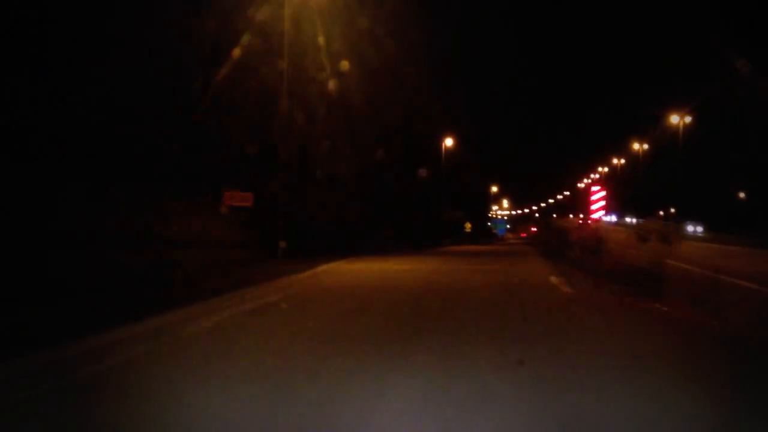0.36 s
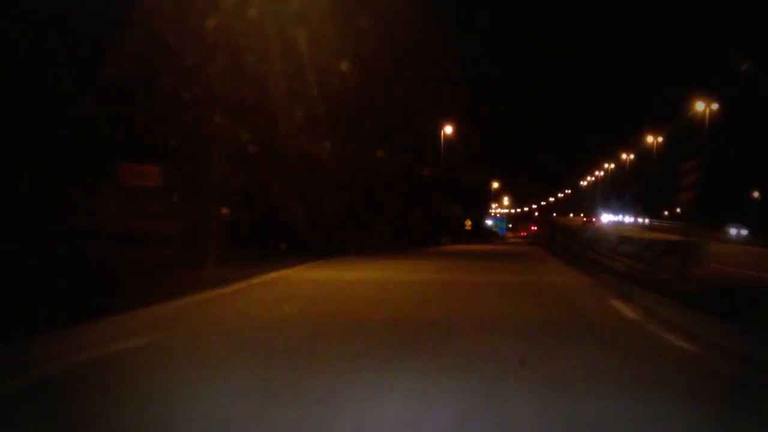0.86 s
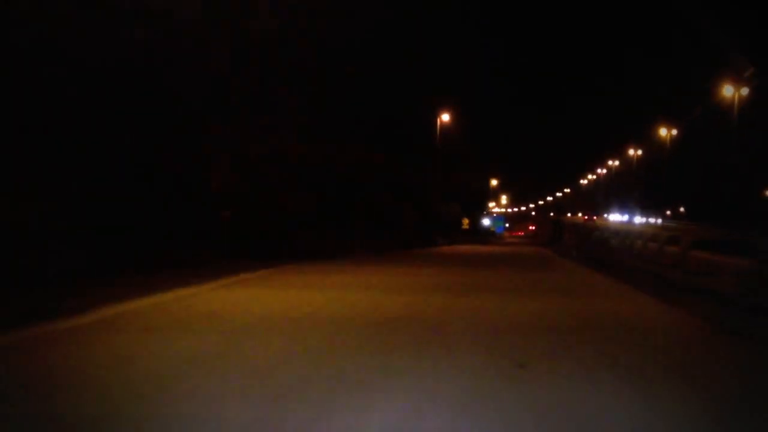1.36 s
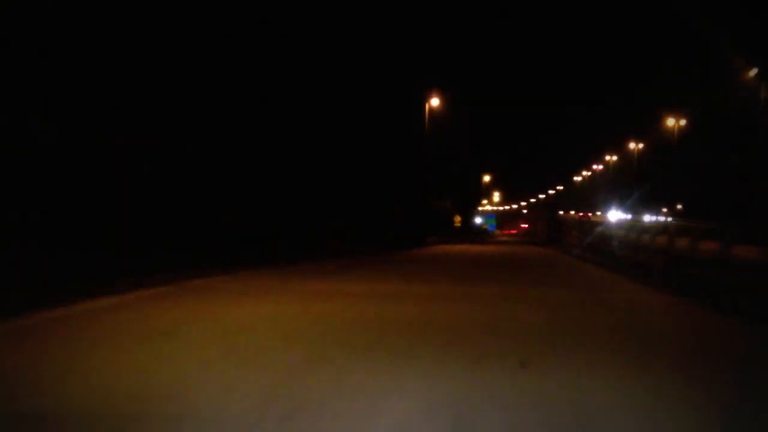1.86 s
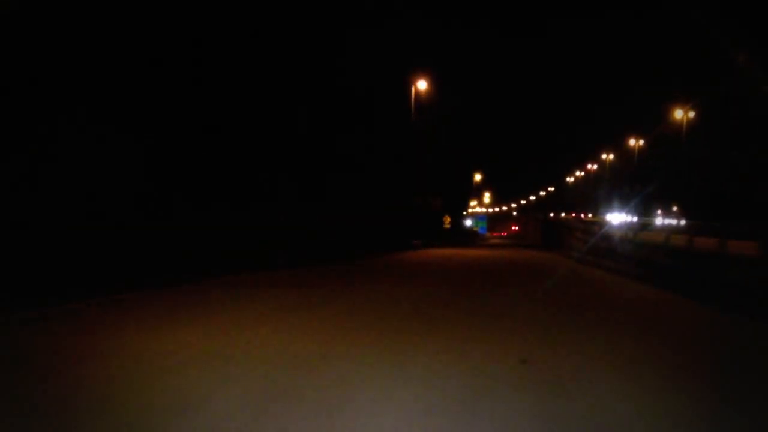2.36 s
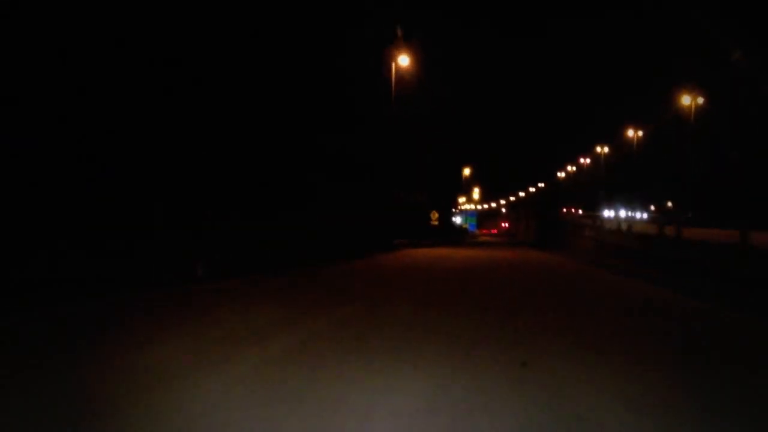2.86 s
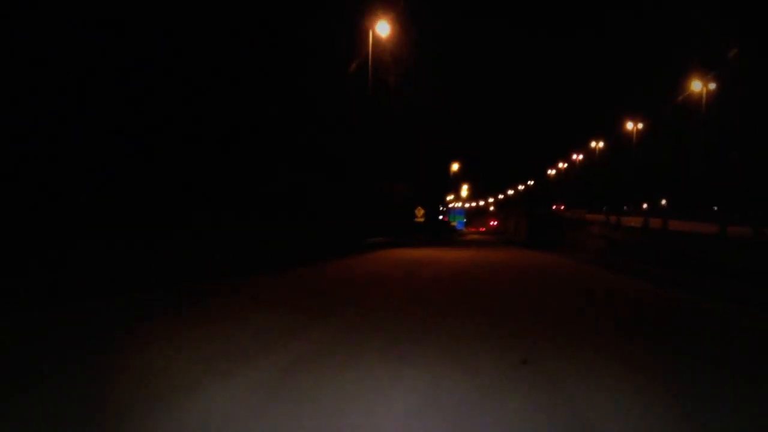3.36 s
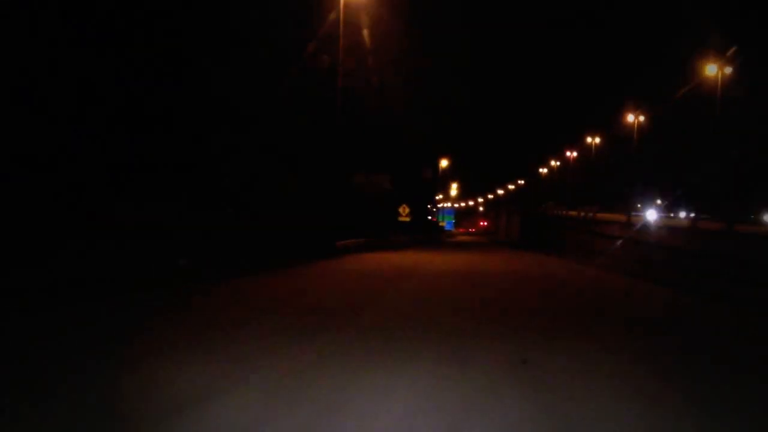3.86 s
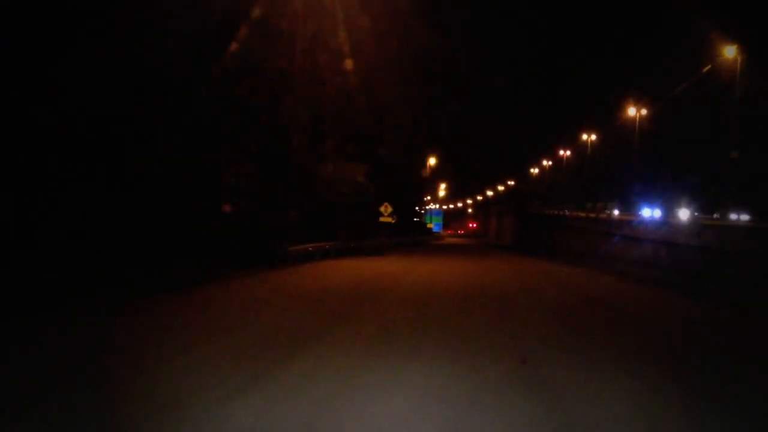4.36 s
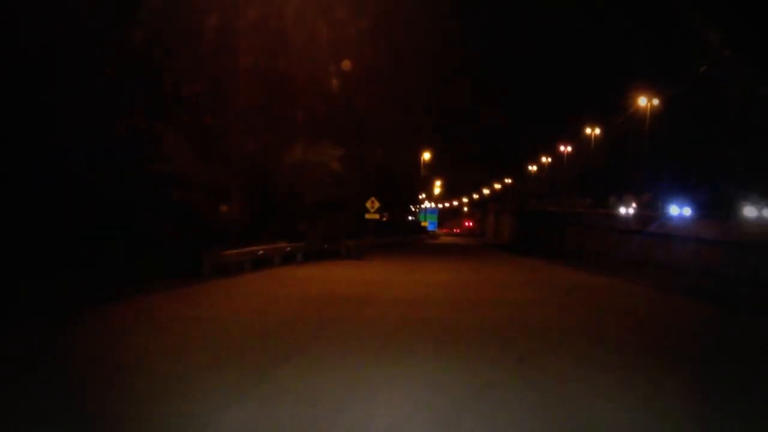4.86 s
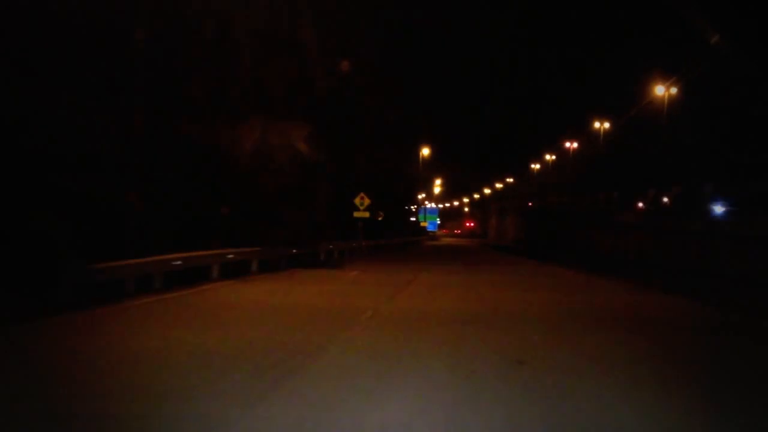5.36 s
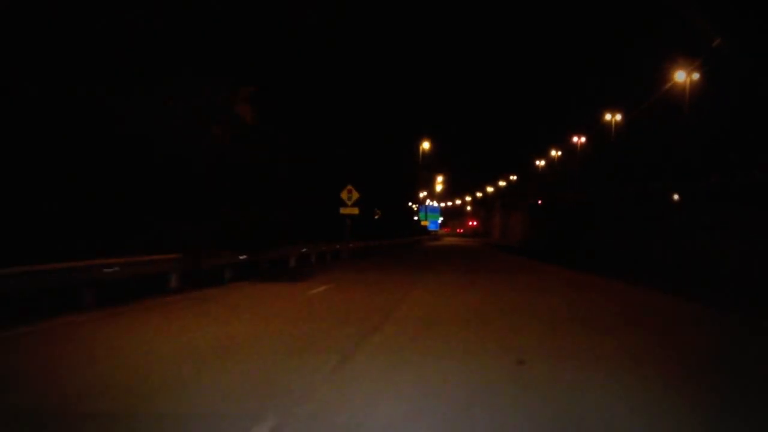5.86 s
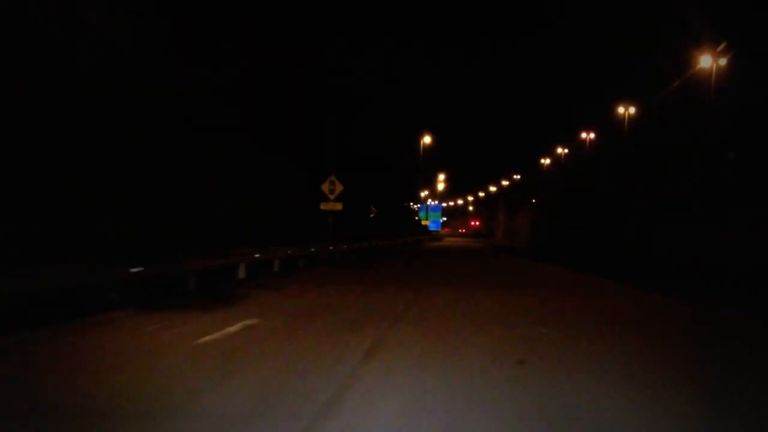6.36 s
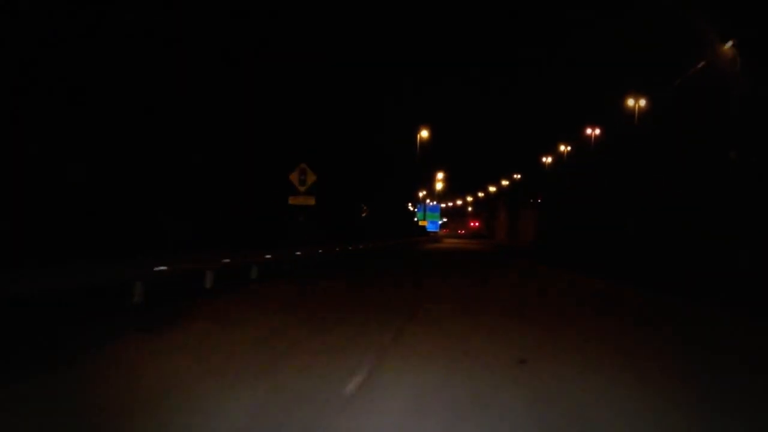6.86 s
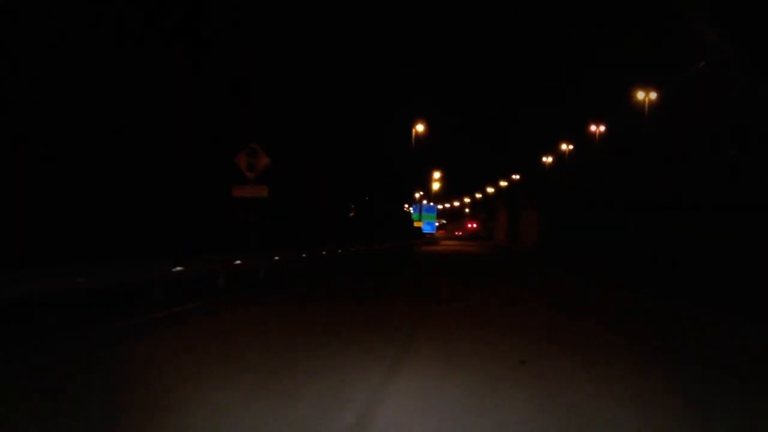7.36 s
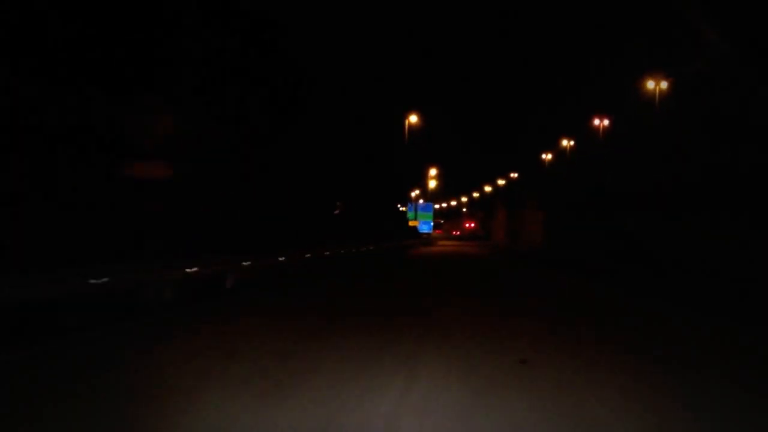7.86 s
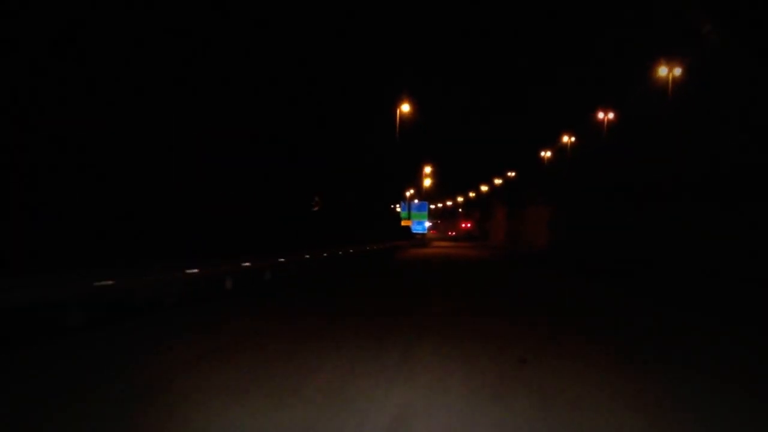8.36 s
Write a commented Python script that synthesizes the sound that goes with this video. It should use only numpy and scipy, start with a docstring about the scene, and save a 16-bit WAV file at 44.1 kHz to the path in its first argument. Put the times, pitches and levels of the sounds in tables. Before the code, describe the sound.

A straight-piped petrol car cruises, recorded close inside the cabin. The deep humming exhaust tone swells and fades through resonances as revs fall for over six seconds, with only a slight hitch midway. Low road rumble and dull roar surround it; clusters of hollow thuds, rattles and low throbs mark uneven tarmac. Then the engine pulls, stepping up twice in pitch, with one sharp trim click near the end.

```python
"""A firing note and its orders boom inside a six-cylinder car with an open exhaust: the pitch coasts down,
then the throttle opens in two steps and the note climbs. The engine is a sum of orders locked to one firing phase.
Shaped noise gives the tyre rumble, road roar and hiss; decaying modes and noise bursts give the bumps
of the road, small metal pings and the ticks of loose trim near the microphone; low throbs swell beside the bumps."""
import sys
import numpy as np
from scipy import signal
from scipy.fft import rfft, irfft, next_fast_len
from scipy.io import wavfile
from scipy.ndimage import uniform_filter1d

SR = 44100
rng = np.random.default_rng(int(sys.argv[2]) if len(sys.argv) > 2 else 0)


def store_pcm(level_fs):
    """Save levels as 16-bit WAV."""
    pcm = np.round(np.clip(level_fs, -1, 1) * 32767).astype(np.int16)
    wavfile.write(sys.argv[1], SR, np.atleast_2d(pcm).T)


def nominal_scale(level):
    """Amplitude ratio for a level in decibels (scalar or array-like)."""
    x = np.asarray(level, float) / 20
    return 10 ** x


N = 374402  # length in samples

# Colour of plastic trim clicking. Each row: frequency in Hz, relative level in dB per Hz
TRIM_COLOUR = [(1800, -30), (2600, -1.5), (3300, -0.5), (4500, 0.5), (6000, -1), (7700, -2), (9000, -11),
               (10000, -9.5), (12000, -7.5), (15000, -11)]


def evened(x):
    """Scales to rms 1."""
    return x / np.sqrt(np.mean(x ** 2) + 1e-20)


def curves(rows):
    """One sample-rate curve for each column after the time."""
    s, *columns = np.transpose(rows)
    return [np.interp(np.arange(N) / SR, s, c) for c in columns]


def read(points, hz):
    """Reads a spectrum in dB on a log-frequency axis."""
    f, db = np.transpose(points)
    return np.interp(np.log(hz + 1), np.log(f + 1), db, left=-100, right=-100)


def coloured(x, points):
    """Filters x by a spectrum."""
    size = next_fast_len(len(x))
    gain = nominal_scale(read(points, np.fft.rfftfreq(size, 1 / SR)))
    return irfft(rfft(x, size) * gain, size)[:len(x)]


def add(mix, s, sound):
    """Mixes a sound in at time s."""
    part = mix[max(round(s * SR), 0):][:len(sound)]
    part += sound[:len(part)]


def drift(size):
    """Slow chance of rms 1, smooth over size samples."""
    return evened(uniform_filter1d(uniform_filter1d(rng.standard_normal(N), size), size))


def lift(resonances, hz):
    """Summed lift in dB of resonances at hz."""
    return sum(db / (1 + (2 * (hz - f) / width) ** 2) for f, width, db in resonances)


def panels(x):
    """The resonances of the cabin panels lift their bands."""
    # Each row: frequency in Hz, width in Hz, lift in dB
    resonances = [(660, 40, 3), (892, 60, 3), (1060, 60, 2), (1237, 35, 3), (1390, 70, 3), (1650, 60, 3),
                  (1810, 50, 3), (2240, 70, 4), (2395, 50, 5), (2826, 80, 5), (3003, 60, 3), (7786, 90, 3)]
    size = next_fast_len(N)
    gain = nominal_scale(lift(resonances, np.fft.rfftfreq(size, 1 / SR)))
    return irfft(rfft(x, size) * gain, size)[:N]


def rushing(points, patchy_db, flicker_db):
    """Noise of a spectrum with drifting patches and a flicker shared by all frequencies; rms 1."""
    frames = N // 256 + 5
    a, b, patches = rng.standard_normal((frames, 513, 3)).T
    patches = uniform_filter1d(patches, size=8, axis=0)  # across frequency
    patches = evened(uniform_filter1d(patches, size=10, axis=1))  # across time
    flicker = evened(uniform_filter1d(rng.standard_normal(frames), size=4))
    field = nominal_scale(patchy_db * patches + flicker_db * flicker)
    white = signal.istft((a + 1j * b) * field, nperseg=1024, noverlap=768)[1][:N]
    return evened(coloured(white, points))


def road():
    """Rumble through the body, roar of the treads, hiss of air, and the ring of the air in the tyres."""
    # Each row: time in seconds, then levels in dB: roar ahead of the panels, rumble, ring of the tyre air
    road_levels = [(0.0, -44.5, -28.5, -36), (0.7, -45.5, -36, -42), (1.1, -45, -33, -40),
                   (2.7, -47, -34, -40), (3.0, -46, -29.5, -40.5), (3.25, -46, -38.5, -38.5),
                   (3.8, -48, -31, -39), (5.3, -49.5, -34.5, -40.5), (5.6, -49.5, -32.5, -40),
                   (6.6, -50, -35.5, -39.5), (7.3, -47.5, -33, -46), (8.0, -46, -33.5, -46.5),
                   (8.49, -46.5, -30.5, -44)]
    # Colours of the three noises. Each row: frequency in Hz, relative level in dB per Hz
    rumble_colour = [(30, -27.5), (55, -17.5), (75, -15), (110, -0.5), (160, 0.5), (240, -1), (330, -4),
                     (450, -12), (600, -21), (900, -41)]
    roar_colour = [(240, -41.5), (400, 0.5), (490, 3), (557, -3.5), (727, -1), (804, -2), (1020, -4),
                   (1230, -8.5), (1770, -15.5), (1930, -17), (2340, -22), (3600, -41.5), (4680, -54),
                   (7920, -120)]
    hiss_colour = [(1500, -41), (2500, -0.5), (3500, -3.5), (5000, -8.5), (7000, -13), (7900, -15.5),
                   (8800, -22), (10000, -32)]

    roar_db, rumble_db, ring_db = curves(road_levels)
    hiss_db = -66 + 1.3 * (roar_db - roar_db.mean())  # follows the roar, 1.3 dB for each dB
    hz, width = 210, 18  # resonance of the tyre air in Hz, and width in Hz of each of two passes
    peak = signal.iirpeak(hz, hz / width, SR)
    ring = signal.lfilter(*peak, signal.lfilter(*peak, rng.standard_normal(N)))
    rumble = nominal_scale(rumble_db) * rushing(rumble_colour, patchy_db=0.0, flicker_db=1.4)
    roar = nominal_scale(roar_db) * rushing(roar_colour, patchy_db=1.2, flicker_db=0.5)
    hiss = nominal_scale(hiss_db) * rushing(hiss_colour, patchy_db=1.46, flicker_db=0.5)
    return rumble + panels(roar + hiss) + nominal_scale(ring_db) * evened(ring)


def crackle():
    """Faint ticks of the trim, about nine a second at random moments, all with one short noise burst."""
    strength = nominal_scale(3.5 * np.minimum(rng.exponential(1, N), 3))  # 0 to 10.5 dB over the faintest
    clicks = strength * (rng.random(N) < 9 / SR)
    t = np.arange(2048) / SR
    burst = evened(coloured(rng.standard_normal(len(t)), TRIM_COLOUR)) * nominal_scale(-60 * t / 0.057)
    return nominal_scale(-77) * signal.oaconvolve(clicks, burst)[:N]


def ticks():
    """Short dry noise bursts of plastic on plastic, each a snap over a weaker, longer tail."""
    # Loose trim. Each row: start in seconds, level in dB of the snap, tilt in dB of the treble against the rest
    trim_hits = [(0.8684, -63, -1), (1.0814, -62, -5), (2.0268, -64, -1), (2.2509, -63, 2),
                 (2.554, -63, -1), (2.9133, -60.5, -2), (3.3494, -67, -10), (3.4434, -60.5, -8),
                 (3.5319, -65, -5), (5.44, -63, -6), (5.502, -61.5, -5), (5.6047, -65, -7),
                 (5.7074, -62, 6), (6.1409, -65, -1), (6.2866, -67, -1), (7.0758, -67, -5),
                 (7.6813, -44.5, -2), (7.7106, -62, 7), (7.7324, -70.5, 16), (7.892, -60, -4),
                 (7.9709, -68.5, 14)]
    bright_hz = 8500  # the tilt acts above this
    snap_t60_s, tail_t60_s, tail_db = 0.029, 0.11, -5.5

    out, t = np.zeros(N), np.arange(4096) / SR
    hz = np.fft.rfftfreq(len(t), 1 / SR)
    fade = nominal_scale(-60 * t / snap_t60_s) + nominal_scale(tail_db - 60 * t / tail_t60_s)
    onset = np.minimum(t / 0.00052, 1)
    for s, level_db, bright_db in trim_hits:
        colour = read(TRIM_COLOUR, hz) + bright_db * (hz > bright_hz)
        burst = evened(irfft(rfft(rng.standard_normal(len(t))) * nominal_scale(colour)))
        add(out, s, nominal_scale(level_db) * fade * burst * onset)
    return out


def ringing(modes, t):
    """A blow into decaying modes, each a little detuned and with its own phase; peak 1."""
    chance = rng.random((len(modes), 2))
    ring = np.zeros(len(t))
    for (hz, db, t60), (a, b) in zip(modes, chance):
        detuned = hz * (.95 + 0.082 * a)
        ring += nominal_scale(db - 60 * t / t60) * np.sin(2 * np.pi * (detuned * t + 0.31 * b))
    ring = ring * np.minimum(t / 0.0033, 1)
    return ring / abs(ring).max()


def pings():
    """A small metal part rings briefly in two close modes."""
    # Each row: start in seconds, peak in dB
    ping_hits = [(0.0194, -57), (1.675, -56), (2.971, -55), (7.878, -59)]
    # Modes of the part. Each row: frequency in Hz ahead of detuning, relative level in dB, t60 in seconds
    ping_modes = [(3320, -0.5, .12), (3160, -9.5, 0.069)]
    out, t = np.zeros(N), np.arange(4096) / SR
    for s, peak_db in ping_hits:
        add(out, s, nominal_scale(peak_db) * ringing(ping_modes, t))
    return out


def bumps():
    """Bumps knock the dashboard, thud the floor and shake the trim; low boom throbs swell beside them."""
    # Each row: time in seconds, then levels in dB: knock ahead of its judder, thud, boom, rattle ahead of its fade
    bump_hits = [(0.084, -21.5, -16, -55, -59), (0.169, -20.5, -22.5, -57, -56.5),
                 (1.008, -38, -23, -49.5, -71), (1.634, -31, -31, -47, -66), (2.865, -27, -34, -40, -77),
                 (2.901, -27, -24, -34.5, -67), (2.947, -17.5, -16.5, -41, -50),
                 (2.967, -30, -24, -50, -54.5), (3.033, -31.5, -24, -51, -61), (3.84, -26.5, -23, -51, -66),
                 (3.96, -26.5, -24, -52, -71), (4.087, -41, -24, -40, -74), (4.267, -45, -17.5, -49, -73),
                 (4.403, -30, -28, -35, -73), (4.604, -19, -21, -36, -64), (4.722, -29, -19, -57, -74),
                 (4.852, -17.5, -16, -35, -65), (4.881, -27, -28, -49, -58.5), (5.119, -45, -28, -35, -67),
                 (5.461, -23.5, -30, -38.5, -61), (5.571, -21.5, -21.5, -52, -72),
                 (5.6, -27.5, -35, -50, -65), (5.734, -27.5, -31, -38, -75)]
    # Modes of dashboard and floor. Each row: frequency in Hz ahead of detuning, relative level in dB, t60 in seconds
    knock_modes = [(294, 9, 0.047), (452, -1, 0.14), (481, 7, 0.066), (557, -12, 0.12), (690, -19, 0.075),
                   (1090, -13, 0.049)]
    thud_modes = [(121.3, -1, 0.37), (180, 8.5, 0.13), (226, -5, 0.16)]
    # Colours of loose parts and trim. Each row: frequency in Hz, relative level in dB per Hz
    judder_colour = [(250, -21), (400, 1), (650, -5), (1100, -12.5), (1800, -24.5), (2600, -41.5)]
    rattle_colour = [(1200, -21), (2000, 1.5), (2700, 1), (3300, 0.5), (4100, -5.5), (4900, -6),
                     (5600, -18), (8000, -28.5)]
    boom_hz, boom_s = 77.7, 0.049  # pitch of the boom throb, and time from its crest to 1/e

    out, t = np.zeros(N), np.arange(8192) / SR
    boom = np.exp(-((t - 2 * boom_s) / boom_s) ** 2) * np.sin(2 * np.pi * boom_hz * t)
    for s, knock_db, thud_db, boom_db, rattle_db in bump_hits:
        # one uneven envelope shared by rattle and judder
        ragged = nominal_scale(3.3 * evened(uniform_filter1d(rng.standard_normal(len(t)), size=250)))
        rattle = evened(coloured(rng.standard_normal(len(t)), rattle_colour))
        rattle *= nominal_scale(-60 * t / 0.15) * ragged * np.minimum(t / .002, 1)
        judder = evened(coloured(rng.standard_normal(len(t)), judder_colour))
        judder *= nominal_scale(-18.5 - 60 * t / 0.12) * ragged
        judder *= np.minimum(t / .01, 1)  # loose parts follow the knock
        knock = ringing(knock_modes, t) + judder
        add(out, s, nominal_scale(knock_db) * knock + nominal_scale(thud_db) * ringing(thud_modes, t))
        add(out, s, nominal_scale(rattle_db) * rattle)
        add(out, s - 1.5 * boom_s, nominal_scale(boom_db) * boom)  # crest just after the row's time
    return out


def cabin(x):
    """A short dense echo makes each gliding order swell and fade."""
    echo = rng.standard_normal(8192) * nominal_scale(-60 * np.arange(8192) / SR / .15)
    echo[0] = 1.1 * np.linalg.norm(echo)  # direct sound
    return signal.oaconvolve(x, echo / np.linalg.norm(echo))[:N]


def engine():
    """Clean orders of the firing rate, over weak orders and clatter that repeat with every six firings."""
    # Each row: time in seconds, firing rate in Hz
    firing_rate = [(0.0, 195.4), (0.5, 189.9), (1.5, 178.4), (2.5, 167.0), (3.0, 162.6), (3.25, 166.3),
                   (3.5, 165.5), (3.75, 159.6), (4.0, 154.8), (5.0, 142.7), (5.75, 134.3), (6.0, 133.3),
                   (6.55, 131.0), (6.75, 146.3), (6.85, 151.9), (6.95, 154.0), (7.1, 152.8), (7.37, 155.4),
                   (7.5, 164.8), (7.63, 170.7), (7.78, 174.4), (8.1, 176.2), (8.49, 177.1)]
    # Each row: time in seconds, throttle from 0 to 1
    throttle_moves = [(0, 0.22), (1.5, 0.12), (2.7, .15), (3.2, 0), (4.5, .05), (5.5, 0.27), (6.55, 0),
                      (6.7, .1), (6.95, .35), (7.37, 0.38), (7.5, .95), (7.9, 0.82), (8.49, 0.74)]
    # Loud orders, in multiples of the firing rate
    loud_orders = 1, 1.5, 2, 2.5, 3
    # Each row, one a loud order: coasting level in dB rms between resonances, gain at full throttle in dB,
    # change while the revs climb in dB (up under load, down when running free), waver when coasting in dB
    loud_levels = [(-39, 13.36, 0, 0.28), (-58, 3, 11.5, 1.8), (-56, 4, 10.5, 2.9), (-61.5, 11.5, 3.5, 2.3),
                   (-62, 7.6, 5.5, 1.1)]
    # Resonances of pipe and cabin that each loud order glides through, one list an order.
    # Each row: frequency in Hz, width in Hz, lift in dB
    loud_swells = [
        [(147, 21, 4.5), (180.7, 29, 11)],
        [(203, 24, 16.5), (234, 12, 9.5), (253.6, 21, 13.5), (286, 8.3, 11.5)],
        [(272.7, 40, 14), (306.6, 20, 11), (342, 20, 9.5), (371, 3.4, 10.5)],
        [(341, 10, 15), (381, 14, 8), (443.3, 41, 11.5), (482, 38, 7.5)],
        [(426, 12, 7.5), (499.3, 20, 9), (530, 20, 3), (575, 50, 12)],
    ]
    # Weak orders from unequal cylinders, in sixths of the firing rate
    weak_sixths = (3, 4, 5, 7, 11, 14, 16, 17, 20, 21, 22, 23, 24, 26, 36, 42, 44, 48, 50, 56, 58, 71, 75,
                    76, 77, 79, 88, 96)
    # Their relative levels. Each row: coasting in dB, pulling in dB
    weak_levels = [(-52, -49), (-54, -48), (-54, -48), (-44, -50), (-48, -50), (-51, -58), (-55, -51),
                   (-57, -51), (-60, -56), (-66, -56), (-62, -59), (-68, -62), (-62, -64), (-65, -68),
                   (-68, -67), (-69, -65), (-70, -70), (-70, -67), (-76, -72), (-79, -68), (-78, -74),
                   (-80, -86), (-81, -90), (-83, -90), (-80, -90), (-79, -84), (-86, -80), (-84, -80)]
    # Colour of the valve clatter. Each row: frequency in Hz, relative level in dB an order
    clatter_colour = [(300, -81.5), (500, -76.5), (900, -78.5), (1500, -76), (2300, -79.5), (3000, -87),
                      (4000, -99.5)]

    hz = curves(firing_rate)[0]
    throttle = np.clip(curves(throttle_moves)[0], 0, 1)
    # gain of weak orders and clatter: -4.5 dB at 160 firings a second off load, 21 dB more an octave up
    weak_db = -4.5 + 21 * np.log2(hz / 160) - 0.5 * throttle
    firings = np.cumsum(hz * (1 + .0006 * drift(size=2000))) / SR
    # 0 to 1, full when the firing rate rises by 20 Hz a second
    climb = uniform_filter1d(np.clip(np.gradient(hz) * SR / 20, 0, 1), size=3000)

    loud = np.zeros(N)
    for k, (db, load_db, climb_db, waver_db), swells in zip(loud_orders, loud_levels, loud_swells):
        db = db + load_db * throttle
        db = db + climb_db * climb * (2 * throttle - 1)
        db = db + lift(swells, k * hz)
        db = db + waver_db * (1 - throttle) * drift(size=5000)
        loud += nominal_scale(db) * np.cos(2 * np.pi * (k * firings + rng.random()))

    # one cycle of the weak orders when coasting, when pulling, and of the valve clatter
    cycle = np.zeros((3, 2049), complex)
    cycle[:2, list(weak_sixths)] = nominal_scale(np.transpose(weak_levels))
    cycle[2, 1:200] = nominal_scale(2.5 * rng.standard_normal(199))
    waves = irfft(cycle * np.exp(2j * np.pi * rng.random(2049)), 4096) * 2048
    uneven = .002 * (1 - .7 * throttle) * drift(size=2500)  # timing wanders off load and blurs high orders
    place = (firings / 6 + uneven) % 1
    coasting, pulling, clatter = (np.interp(place, np.arange(4096) / 4096, w, period=1) for w in waves)
    weak = (1 - throttle) * coasting + throttle * pulling + coloured(clatter, clatter_colour)
    return np.sqrt(2) * (loud + nominal_scale(weak_db) * cabin(panels(weak)))  # root 2 turns rms into peak


def scene():
    """All sources reach one microphone in the cabin."""
    return (road() + crackle() + ticks() + pings() + bumps() + engine())[None]


def roll_off(x):
    """The treble ends steeply here."""
    return signal.sosfilt(signal.butter(12, 16090, fs=SR, output="sos"), x)


def record(dry):
    """The microphone drops the deepest bass and adds its own faint hiss; then the treble is band-limited."""
    # Colour of the microphone hiss. Each row: frequency in Hz, relative level in dB per Hz
    self_noise = [(5000, -34), (8600, -4), (10100, -7), (11500, -3), (13600, 0), (15500, -1)]
    hiss = nominal_scale(-77.7) * evened(coloured(rng.standard_normal(N), self_noise))
    low_cut = signal.butter(2, 60, "high", fs=SR, output="sos")
    thinned = signal.sosfilt(low_cut, dry)
    edge = signal.firwin(511, 15330, window=("kaiser", 9), fs=SR)  # low-pass in Hz
    mix = signal.oaconvolve(thinned + hiss, edge[None], "same")
    return roll_off(mix)


dry = scene()
out = record(dry)
store_pcm(out)
```